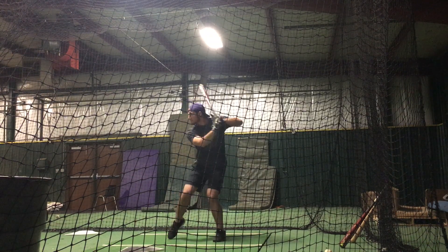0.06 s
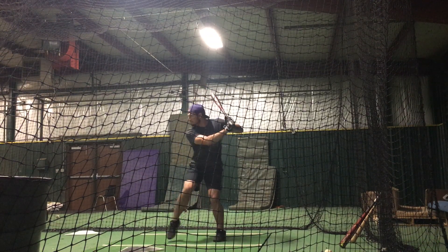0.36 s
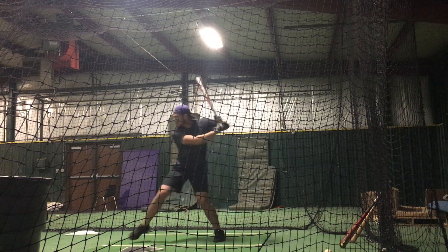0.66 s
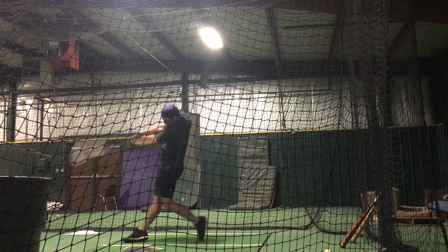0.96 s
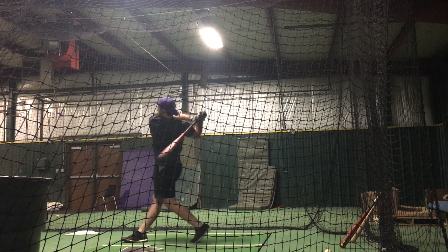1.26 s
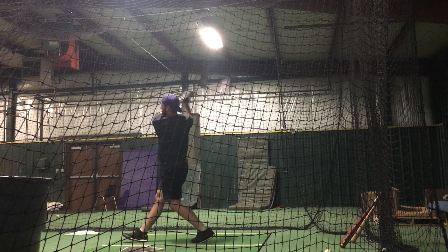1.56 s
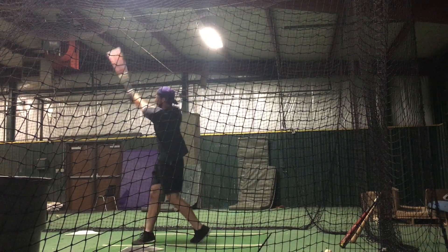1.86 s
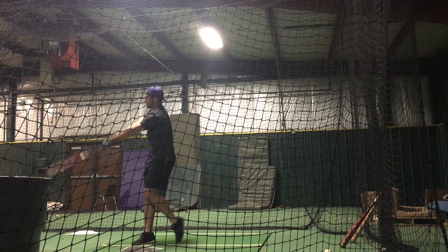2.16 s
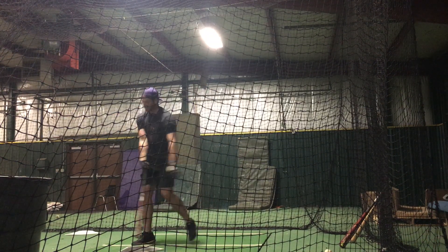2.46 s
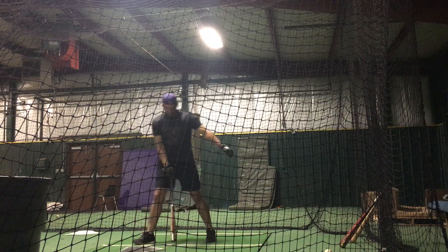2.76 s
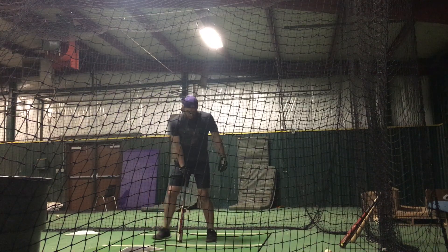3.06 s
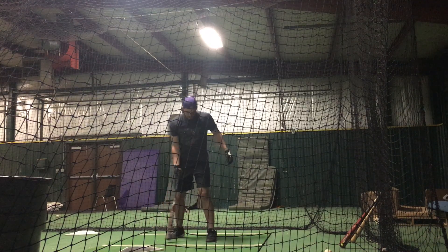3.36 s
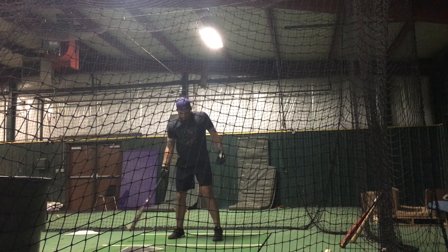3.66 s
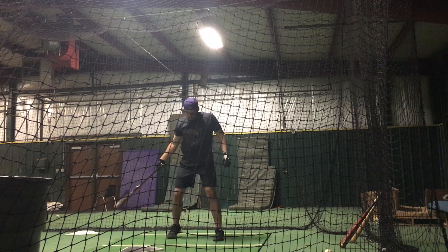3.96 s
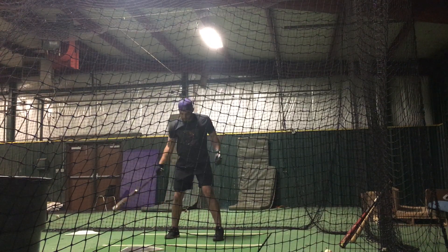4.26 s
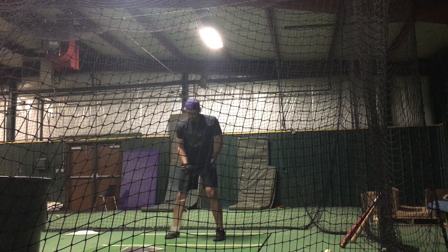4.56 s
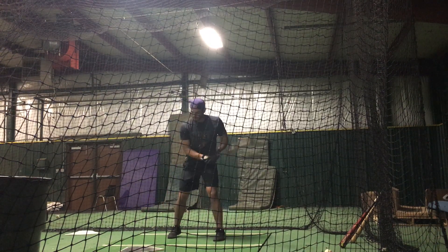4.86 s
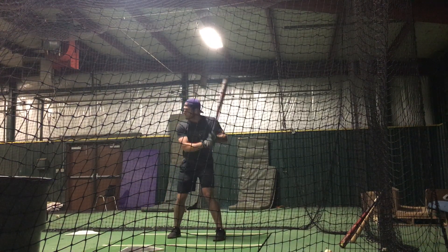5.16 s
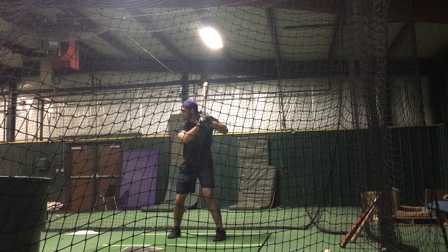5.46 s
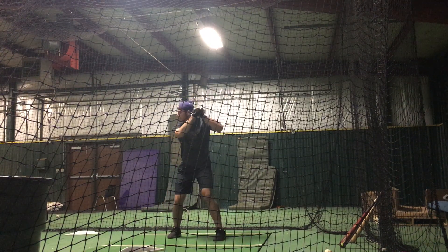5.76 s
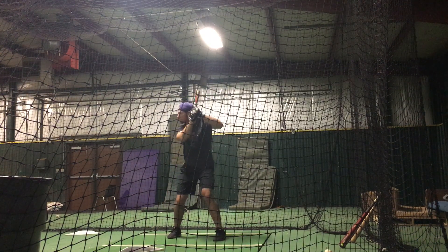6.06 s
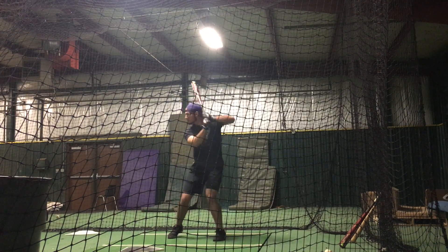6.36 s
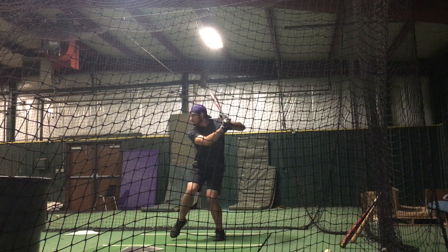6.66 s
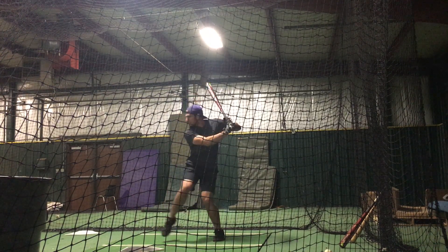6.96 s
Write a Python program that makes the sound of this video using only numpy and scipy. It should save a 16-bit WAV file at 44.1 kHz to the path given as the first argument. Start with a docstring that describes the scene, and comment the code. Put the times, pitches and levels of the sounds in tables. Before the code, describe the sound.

Low ventilation rumbles steadily in a large hall throughout, heard from one fixed microphone. A soft footfall and a quick swish come just before 1 second. At about 1.05 seconds a metal bat hits a ball with a loud, hard crack and a bright ping that echoes for about a second. The ball whips into the net at 1.2 seconds, the steel frame rings thinly and a tiny trinket tinkles faintly. The netting drones and rattles around 1.7 seconds. The ball lands on the turf with a dull thud just after 2 seconds, and softer bounces and footfalls follow from 2.7 to 3.3 seconds, with a faint low roll. Clothes rustle and gloves creak very quietly, mostly between 3 and 4.7 seconds. From about 5 seconds a faint low fan hum joins the rumble, with only slight fabric sounds until the end near 7 seconds.

```python
"""In a large hall with rumbling ventilation, a batter swings a metal bat inside a netted cage.
The ball cracks off the barrel, which rings. The swing smears that ring into a band of pitches,
because a moving source sounds higher ahead and lower behind (the Doppler effect).
The ball runs into the net and jolts its steel frame, then drops, bounces and rolls on the turf.
Clothes rustle, gloves creak and a small trinket tinkles as the batter moves."""
import sys
import numpy as np
from scipy import signal
from scipy.fft import rfft, irfft
from scipy.io import wavfile
from scipy.ndimage import uniform_filter1d, minimum_filter1d

SR = 44100
rng = np.random.default_rng(int(sys.argv[2]) if len(sys.argv) > 2 else 0)


def transcribe(signal):
    """Save signal, clipped to [-1, 1], as a 16-bit WAV file at the path in sys.argv[1]."""
    frames = np.atleast_2d(signal).T
    limited = np.clip(frames, -1, 1)
    pcm = np.round(limited * 32767).astype(np.int16)
    wavfile.write(sys.argv[1], SR, pcm)


N = 308700
TIME = np.arange(N) / SR
HIT_S = 1.054   # the bat meets the ball

# Levels in a table are relative. A fade_s is the time to die away by 60 dB;
# a rise_s or fall_s is the time to change by 10 dB.
# how long the hall rings: pitch_hz, fade_s
HALL_FADES = [(100, 1.1), (400, 0.73), (1500, 0.97), (3000, 1.242), (7000, 0.94), (14000, .85)]
# echoes from walls and roof: delay_s, gain
ECHOES = [(0.012, 0.46), (0.016, .25), (.038, .2), (.089, 0.17), (.109, .17)]
# tone of the ventilation: pitch_hz, level_db
AIR_TONE = [(15, -37), (25, -7.5), (64, 0), (169, -16.5), (183, -20.5), (281, -24), (322, -32), (359, -26),
            (552, -34), (741, -30), (1850, -46.5), (8810, -52), (15500, -55)]
# tone of the hall's rumble and the rolling ball: pitch_hz, level_db
RUMBLE_TONE = [(50, -20), (90, -7.5), (125, 1.5), (170, -4), (230, -5), (400, -17), (900, -25),
               (2000, -41.5), (8000, -65.5)]

# the batter strides, unwinds, steps back and takes a stance: peak_s, level_db, fall_s
MOVES = [(.11, -72, 0.18), (.48, -79.5, 0.17), (.89, -67.5, 0.14), (2.42, -73.5, 0.53), (2.79, -68, 0.28),
         (3.03, -68.5, 0.02), (3.23, -71.5, 0.14), (3.45, -76, 0.45), (4.02, -78, 0.3), (4.36, -65.5, 0.19),
         (4.64, -67.5, 0.194), (5.16, -66.5, 0.0083), (5.32, -77, .7), (6.62, -72, 0.18)]
# gloves creaking on the grip: start_s, level_db
CREAKS = [(3.03, -66), (3.225, -64), (4.265, -64), (4.335, -62), (4.358, -59), (4.38, -62), (4.574, -59),
          (4.639, -61)]
# tone of rubbing fabric: pitch_hz, level_db
CLOTH_TONE = [(600, -17), (1600, -5), (2250, 2.5), (2800, -3), (4300, 0), (5200, -5.5), (6500, -6),
              (9000, -13), (13000, -19), (16000, -24.5)]
# touches on the trinket: start_s, level_db
TINKLES = [(0.994, -63), (1.004, -68), (1.28, -54.5), (1.315, -52), (2.35, -67.5), (2.375, -70),
           (2.70, -76), (2.735, -76), (2.812, -74)]
# the trinket's notes: pitch_hz, level_db, fade_s
TRINKET_NOTES = [(8900, 0, .03), (9050, -3, .02), (14300, 0, .02), (14890, -8, 0.01201)]
# a swish, then a brief swell of hiss just before the crack: peak_s, level_db, rise_s, fall_s
WHOOSH_SWELLS = [(0.98, -60, .025, .3), (1.049, -37, .015, .02)]
# tone of that swish and hiss: pitch_hz, level_db
WHOOSH_TONE = [(60, 4), (250, 1), (600, -6), (1100, -2), (2000, -9.5), (3500, -12), (8000, -21),
               (16000, -31.5)]

# notes of the steel frame and its clips: pitch_hz, level_db, fade_s
FRAME_NOTES = [(3480, 3, 0.8), (6336, -8.5, .59), (7106, -13, .57), (7935, -23, .5), (12450, -25, .7),
               (12800, -18, 0.74), (14230, -20, .4), (14650, -21, .35)]
# the ball whips into the net: start_s, level_db
WHIPS = [(1.172, -33), (1.3, -50.5)]
# jerks that shake the net: peak_s, level_db, fall_s
NET_JERKS = [(1.6, -54, 0.07), (1.675, -40.5, 0.0415), (1.78, -58, 0.3)]
# tone of the rattling knots: pitch_hz, level_db
RATTLE_TONE = [(150, -6.5), (700, 4.5), (1400, -2), (2400, -5.5), (5000, -18), (12000, -29.5), (16000, -35)]
# tone of the tight cords: pitch_hz, level_db
DRONE_TONE = [(120, -19), (270, -13), (320, 1), (380, -17.5), (620, -12.5), (1000, -34.5), (4000, -75)]
# footfalls, the ball in the net and its bounces: start_s, thump_db, slap_db, pitch_factor
THUDS = [(.837, -38, -35, 0.85), (.882, -45.5, -50, 0.69), (1.179, -36.5, -18, .4),
         (2.053, -20, -14.5, 1.01), (2.729, -30.5, -22, 0.884), (3.082, -42.5, -28.5, 1.39),
         (3.222, -42, -50, 0.594), (3.285, -45, -35, 0.87)]
# low notes of a thud at a pitch_factor of 1: pitch_hz, level_db, fade_s
THUMP_NOTES = [(262.6, 0.5, .04), (338.4, -1, 0.05506), (166, -22, 0.024), (345, -23, .25)]
# tone of the slap on top of a thud: pitch_hz, level_db
SLAP_TONE = [(100, -15), (450, -1.5), (800, 1), (1200, -4.5), (1900, -7), (2600, -18), (5000, -23.5),
             (9000, -29), (16000, -45.5)]

# short notes of the ball and the bending bat: pitch_hz, level_db, fade_s
KNOCK_NOTES = [(75.5, -30, 0.081), (320, -28, 0.021), (616, -24, .035), (918, -21.5, 0.11),
               (1130, -21.5, .06), (1440, -20, 0.043), (1800, -10, 0.015), (1980, -11, 0.046),
               (2564, -12, .09), (4325, -24, .14), (5300, -23, .12), (5764, -22.5, 0.15), (7590, -22, .13)]
# what the turf sends back of the knock: pitch_hz, level_db, fade_s
FLOOR_NOTES = [(700, -16.5, .025), (1630, -8, .02), (2120, 0, 0.012)]
# tone of the crack heard directly: pitch_hz, level_db
CRACK_TONE = [(50, -14), (200, -14), (600, -10), (1200, -5), (2100, -0.5), (3500, -9), (6000, -9.5),
              (9000, -19.5), (12000, -22), (16000, -33)]
# tone of the crack as the hall returns it: pitch_hz, level_db
WASH_TONE = [(50, -6), (250, 2.5), (450, -7), (900, -3.5), (2000, -2.5), (3600, 0), (4900, -5.5),
             (6000, -4), (8000, -10), (10500, -20.5), (16000, -31)]
# the barrel's ringing notes: pitch_hz, level_db, fade_s
BARREL_NOTES = [(2749, 2, 0.46), (3330, -12.5, .45), (4460, -19, .2), (5455, -19, 0.18), (6020, -16, 0.12),
                (6800, -23.5, 0.18), (7850, -17, 0.13)]
# the barrel's flight after the hit: time_s, speed_m_per_s, towards_microphone_m_per_s
SWING = [(1.054, 26.8, -17), (1.085, 24.5, -10), (1.12, 23, 7), (1.15, 22.5, 20), (1.22, 19, 14),
         (1.35, 7.8, -8.5), (1.7, 5.5, 11)]


def from_db(db):
    """Turns decibels into a gain to multiply by."""
    return 10 ** (np.asarray(db) / 20)


def unit_energy(x):
    """Scales a sound so that its squared samples add up to 1."""
    return x / np.sqrt(np.sum(x ** 2) + 1e-20)


def at_hz(points, hz):
    """Reads a curve between its listed pitches."""
    pitches, values = np.transpose(points)
    return np.interp(np.log(hz + 1), np.log(pitches), values)


def convolve(x, response):
    """Lets every sample of x set off its own copy of the response."""
    return signal.fftconvolve(x, response)[:N]


def place(sound, start_s):
    """Sets a sound into silence at the given time."""
    start = round(start_s * SR)
    return np.pad(sound, (start, max(N - start - len(sound), 0)))[:N]


def keep_side(x, side, hz, order=2):
    """Keeps the "low" or "high" side of a pitch and turns the rest down."""
    return signal.sosfilt(signal.butter(order, hz, side, fs=SR, output="sos"), x + 1e-18)


def colour(x, tone, size=16384):
    """Gives a sound the bass and treble of a tone table; white noise keeps its power."""
    gains = from_db(at_hz(tone, np.fft.rfftfreq(size, 1 / SR)))
    cepstrum = irfft(np.log(gains))
    # fold onto the first half, so the filter never sounds ahead of its input
    cepstrum[1:size // 2] *= 2
    cepstrum[size // 2 + 1:] = 0
    response = irfft(np.exp(rfft(cepstrum)))
    return convolve(x, unit_energy(response))


def noise(tone):
    """Steady noise with the given tone."""
    return colour(rng.standard_normal(N), tone)


def burst(fade_s):
    """A puff of white noise that dies away."""
    t = TIME[:SR // 4]
    return rng.standard_normal(len(t)) * from_db(-60 * t / fade_s)


def evened(x):
    """Smooths a short noise's spectrum, so that it has no pitch of its own."""
    spectrum = rfft(x)
    power = uniform_filter1d(np.abs(spectrum) ** 2, size=150)
    flat = irfft(spectrum * np.sqrt(power.mean() / power))
    return flat[:len(flat) // 2]


def grains(per_s, spread_db):
    """Tiny random clicks of uneven size, with an average power of 1."""
    sizes = from_db(spread_db * np.minimum(rng.exponential(1, N), 4))
    signs = rng.choice([-1, 1], N)
    clicks = sizes * signs * (rng.random(N) < per_s / SR)
    return clicks / np.sqrt(np.mean(clicks ** 2) + 1e-20)


def ring(notes, t):
    """The fading notes of a struck object, at times t after the blow."""
    return sum(from_db(db - 60 * t / fade_s) * np.sin(2 * np.pi * hz * t) for hz, db, fade_s in notes)


def swell(peak_s, level_db, rise_s, fall_s):
    """A gain that grows to a peak and dies away."""
    early, late = np.maximum(peak_s - TIME, 0), np.maximum(TIME - peak_s, 0)
    return from_db(level_db - np.minimum(10 * (early / rise_s + late / fall_s), 200))


def gestures(rows, rise_share):
    """The gain of overlapping movements; each rises in a share of its fall time."""
    return np.sqrt(sum(swell(s, db, rise_share * fall_s, fall_s) ** 2 for s, db, fall_s in rows))


def echoes(x):
    """Walls and roof send back late, quieter copies."""
    return sum(gain * place(x, delay_s) for delay_s, gain in ECHOES)


def hall_tail(build_s, fade_share=1):
    """The hall's blur of echoes builds up, then each band of pitches dies at its own rate."""
    t = TIME[:2 ** 16]
    white = rfft(rng.standard_normal(len(t)))
    hz = np.fft.rfftfreq(len(t), 1 / SR)
    centres, fades = np.transpose(HALL_FADES)
    bands = [irfft(white * at_hz(np.c_[centres, share], hz)) for share in np.eye(len(centres))]
    dying = sum(band * from_db(-60 * t / (fade_s * fade_share)) for band, fade_s in zip(bands, fades))
    return unit_energy(dying * (1 - np.exp(-t / build_s)))


def in_hall(x, echo_db, tail_db):
    """A sound with its separate echoes and its blurred tail."""
    return x + from_db(echo_db) * echoes(x) + from_db(tail_db) * convolve(x, hall_tail(build_s=0.011))


def ventilation(hum_hz=160, hum_start_s=4.7, fade_in_s=0.65, ebb_db_per_s=2.5):
    """Air rumbles steadily; a fan's faint low note comes up and slowly ebbs."""
    running_s = np.maximum(TIME - hum_start_s, 0)
    hum_gain = from_db(-59.5 - ebb_db_per_s * running_s) * np.minimum(running_s / fade_in_s, 1)
    return from_db(-53) * noise(AIR_TONE) + hum_gain * np.sin(2 * np.pi * hum_hz * TIME)


def hall_rumble(peak_s=4.1, slope_db_per_s=1.75, fade_in_s=0.75):
    """Low noise fades in, slowly swells and ebbs."""
    level_db = -59.5 - slope_db_per_s * np.abs(TIME - peak_s)
    fade_in = np.minimum(TIME / fade_in_s, 1) ** 2
    return from_db(level_db) * fade_in * noise(RUMBLE_TONE)


def clothes():
    """Fabric rubs in tiny clicks with each movement; the gloves creak on the grip."""
    motion = np.hypot(gestures(MOVES, rise_share=0.55), from_db(-90))   # cloth is never quite still
    rubbing = from_db(-3.5) * motion * grains(per_s=2300, spread_db=2.5)
    creaks = sum(from_db(db) * place(burst(fade_s=0.017), s) for s, db in CREAKS)
    return in_hall(colour(rubbing + creaks, CLOTH_TONE), echo_db=-7.5, tail_db=-5.5)


def trinket():
    """Each touch is a tiny chatter that sets a small piece of metal ringing."""
    touches = sum(from_db(db) * place(burst(fade_s=0.079), s) for s, db in TINKLES)
    ringing = unit_energy(ring(TRINKET_NOTES, TIME[:SR // 8]))
    return in_hall(convolve(touches, ringing), echo_db=-5.5, tail_db=-6.5)


def whoosh():
    """A swish, then a brief swell of hiss just before the crack."""
    return sum(swell(*row) for row in WHOOSH_SWELLS) * noise(WHOOSH_TONE)


def rolling_ball():
    """The ball rolls out over the turf with a low rumble."""
    return swell(peak_s=3, level_db=-56, rise_s=0.25, fall_s=0.26) * noise(RUMBLE_TONE)


def steel_frame(build_s=0.008):
    """The cage's steel takes up the net's jolt softly and rings in thin, high notes."""
    t = TIME[:SR]
    ringing = ring(FRAME_NOTES, t) * (1 - np.exp(-t / build_s))
    return from_db(-41) * place(ringing, start_s=1.265)


def net():
    """The ball whips into the net and stretches it; tight cords drone while the knots rattle."""
    whips = sum(from_db(db) * place(burst(fade_s=0.08), s) for s, db in WHIPS)
    whips = keep_side(whips, "high", hz=6002)
    knots = colour(grains(per_s=1000, spread_db=1.5), RATTLE_TONE)
    rattle = gestures(NET_JERKS, rise_share=0.49) * knots
    drone = swell(peak_s=1.63, level_db=-44.5, rise_s=0.18, fall_s=0.1276) * noise(DRONE_TONE)
    return drone + from_db(-4) * in_hall(rattle + whips, echo_db=-5.5, tail_db=-2.5)


def thuds():
    """Feet and ball land with a low thump and a slap; gentler blows touch longer and sound duller."""
    t = TIME[:SR // 2]
    thumps = sum(from_db(db) * place(ring(THUMP_NOTES, t * pitch), s) for s, db, _, pitch in THUDS)
    thumps = keep_side(thumps, "low", hz=600)
    thumps = keep_side(thumps, "high", hz=130)
    click = signal.unit_impulse(SR // 20)
    slaps = np.zeros(N)
    for start_s, _, slap_db, _ in THUDS:
        dulled = keep_side(click, "low", hz=8500 * from_db(0.6 * slap_db))
        slaps += from_db(slap_db) * place(dulled, start_s)
    slaps = colour(slaps, SLAP_TONE)
    scatter = from_db(2.5) * convolve(slaps, unit_energy(burst(fade_s=0.32)))   # off mats and frames
    return in_hall(thumps, echo_db=1, tail_db=-5.5) + in_hall(slaps, echo_db=-5, tail_db=0) + scatter


def bat_knock(floor_delay_s=0.0037):
    """The ball and the bending bat give a solid knock, which the floor sends back."""
    knock = place(ring(KNOCK_NOTES, TIME[:SR // 2]), HIT_S)
    off_floor = from_db(-7) * place(ring(FLOOR_NOTES, TIME[:SR // 8]), HIT_S + floor_delay_s)
    return in_hall(knock + off_floor, echo_db=-11, tail_db=-9)


def bat_crack():
    """The contact makes a hard crack that scatters off floor and frames and washes round the hall."""
    crack = from_db(-9) * evened(burst(fade_s=0.055))
    scatter = from_db(-21.5) * evened(burst(fade_s=0.13))
    wash = from_db(11) * colour(hall_tail(build_s=0.003), WASH_TONE)
    return place(colour(crack + scatter, CRACK_TONE), HIT_S) + place(wash, HIT_S)


def bat_ping(swell_s=0.010003, directions=12, sound_m_per_s=343):
    """The barrel rings as it flies, so each direction gets its own shift in pitch."""
    t = TIME[:SR]
    times, speeds, approaches = np.transpose(SWING)
    speed = np.interp(HIT_S + t, times, speeds)
    approach = np.interp(HIT_S + t, times, approaches)

    def shifted_ring(closing_speed):
        """The nearer the barrel comes, the sooner its sound arrives."""
        metres_nearer = np.cumsum(closing_speed) / SR
        return ring(BARREL_NOTES, t + metres_nearer / sound_m_per_s)

    # the ring swells in about a hundredth of a second after the hit
    swell_in = 1 - np.exp(-(t / swell_s) ** 4)
    direct = place(shifted_ring(approach) * swell_in, HIT_S)
    angles = np.pi * (np.arange(directions) + 0.5) / directions
    rings = [shifted_ring(speed * np.cos(angle)) for angle in angles]
    tails = sum(convolve(ringing, hall_tail(build_s=0.0045, fade_share=0.89)) for ringing in rings)
    hall = place(tails / np.sqrt(directions), HIT_S)
    return from_db(-6) * direct + from_db(-16) * echoes(direct) + from_db(-8) * hall


def scene():
    """The hit, the ball's path, the batter's movements and the hall, at one microphone."""
    hit = bat_ping() + bat_knock() + bat_crack()
    ball = thuds() + net() + steel_frame() + rolling_ball()
    batter = whoosh() + clothes() + trinket()
    background = ventilation() + hall_rumble()
    return (hit + ball + batter + background)[None]


def limiter(x, ceiling_db, recover_db_per_s):
    """Turns the volume down at once on a peak, then steadily back up."""
    over_db = np.maximum(20 * np.log10(np.abs(x) + 1e-9) - ceiling_db, 0)
    recovery_db = recover_db_per_s * TIME
    held_db = np.maximum.accumulate(over_db + recovery_db, axis=-1) - recovery_db
    smooth_db = uniform_filter1d(minimum_filter1d(-held_db, size=24), size=24)
    return x * from_db(smooth_db)


def record(dry):
    """The microphone sheds the deepest bass, a limiter flattens the hit, the top treble is cut."""
    trimmed = keep_side(dry, "high", hz=38, order=8)
    limited = limiter(trimmed, ceiling_db=-3.2, recover_db_per_s=500.5)
    treble_cut = signal.ellip(10, 0.1, 80, 15900, fs=SR, output="sos")
    return signal.sosfilt(treble_cut, limited)


dry = scene()
out = record(dry)
transcribe(out)
```